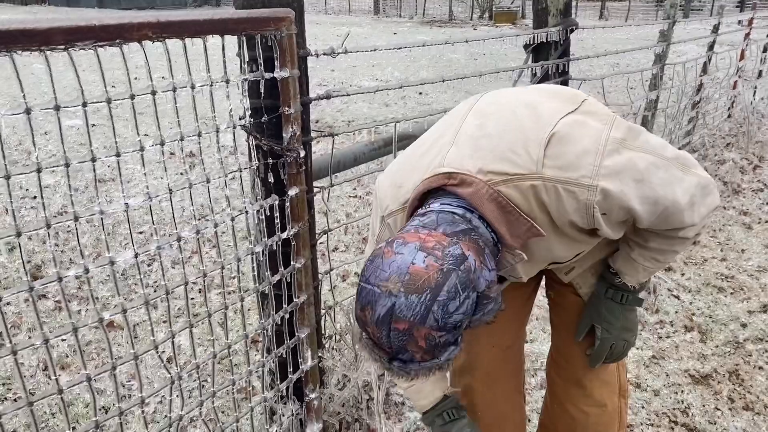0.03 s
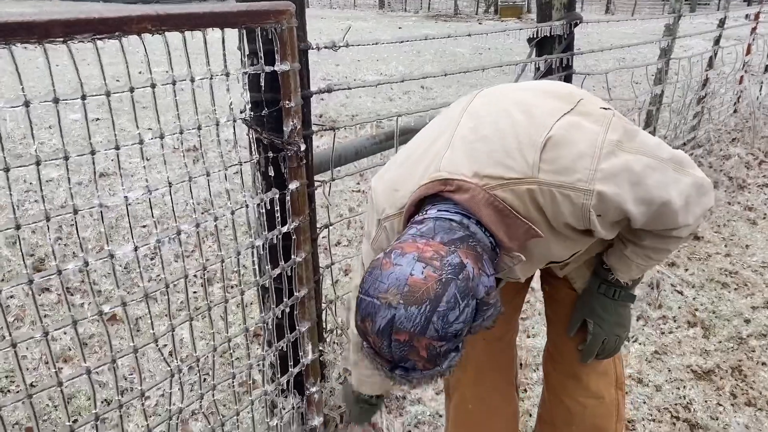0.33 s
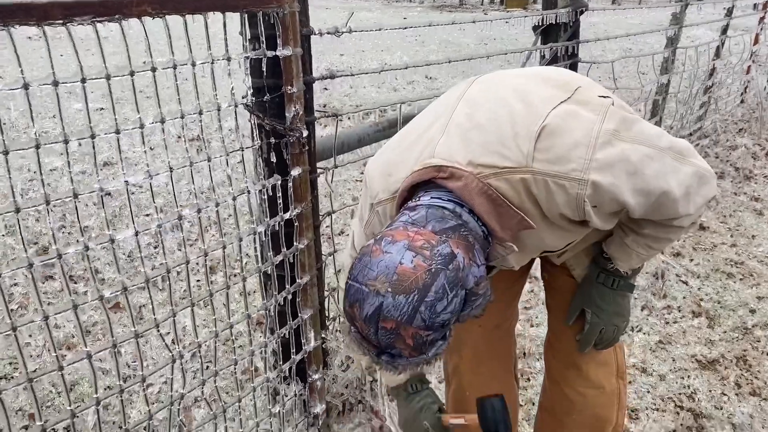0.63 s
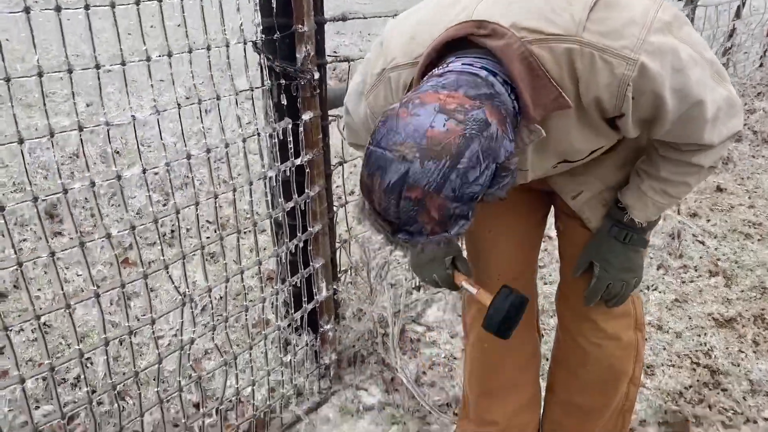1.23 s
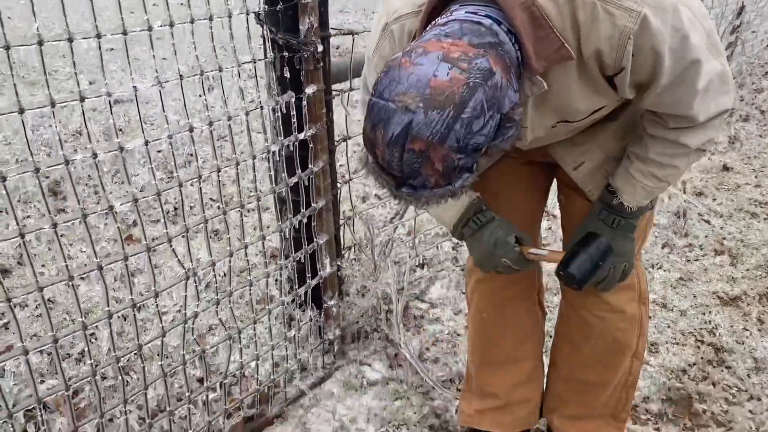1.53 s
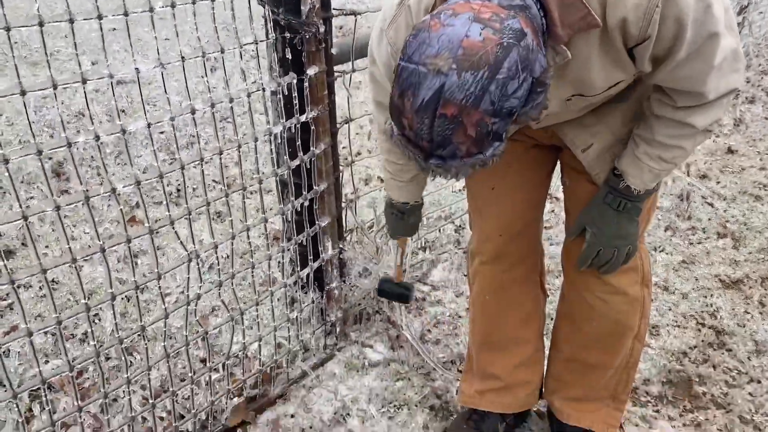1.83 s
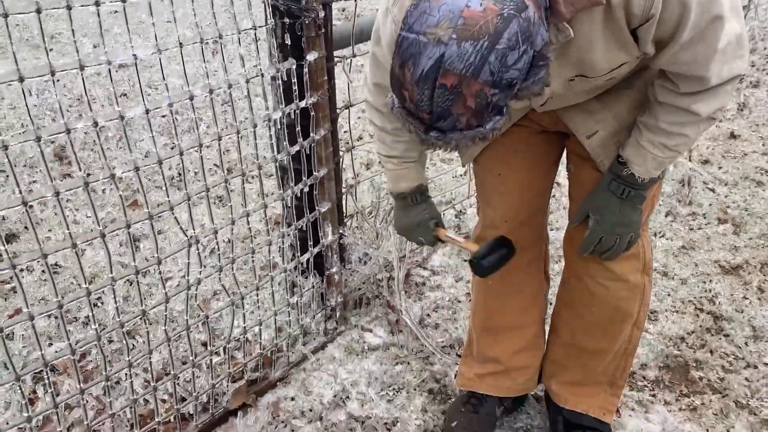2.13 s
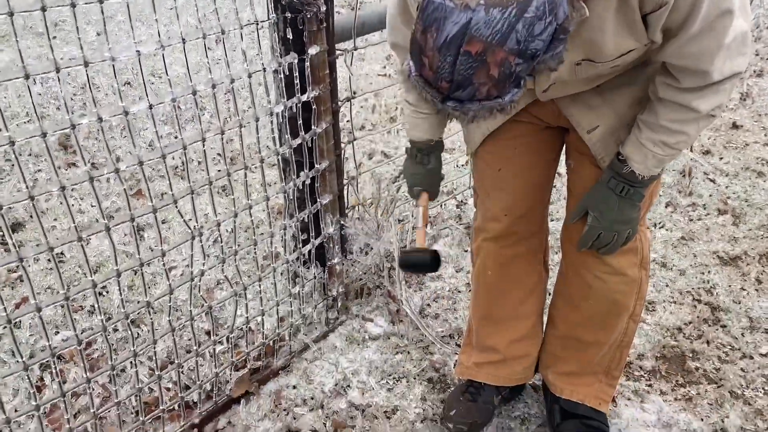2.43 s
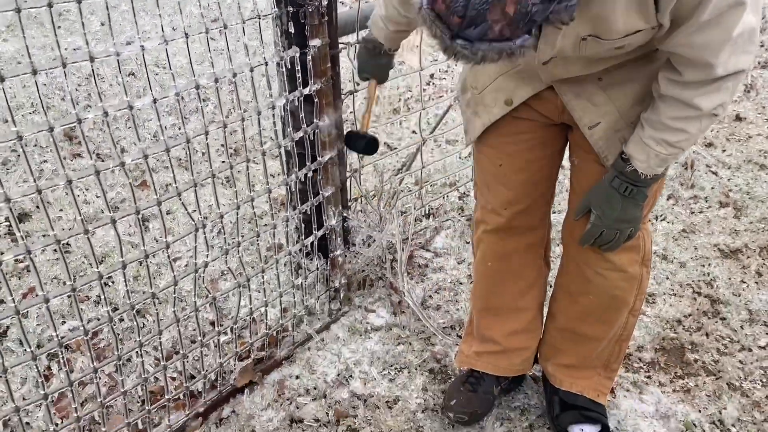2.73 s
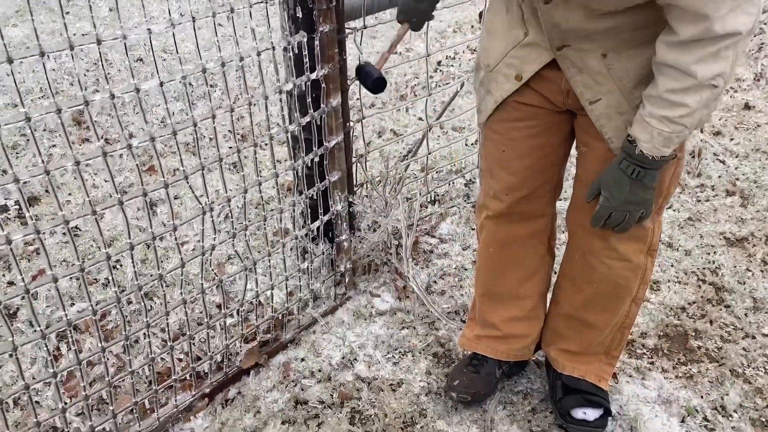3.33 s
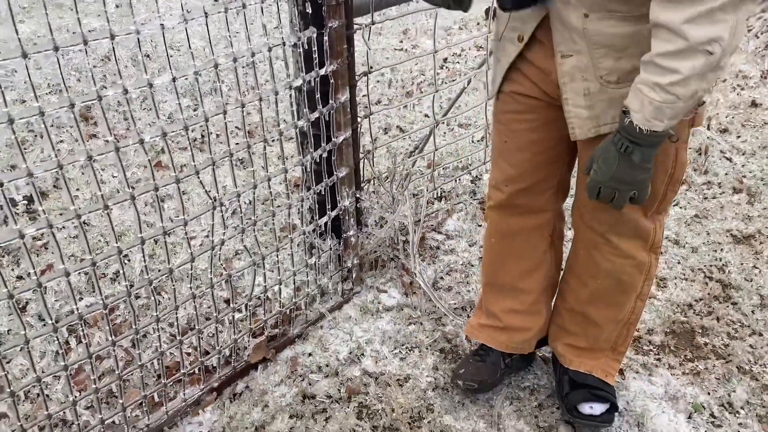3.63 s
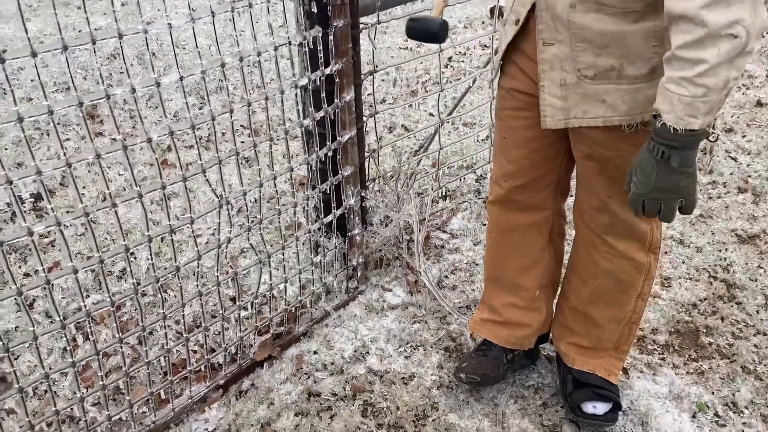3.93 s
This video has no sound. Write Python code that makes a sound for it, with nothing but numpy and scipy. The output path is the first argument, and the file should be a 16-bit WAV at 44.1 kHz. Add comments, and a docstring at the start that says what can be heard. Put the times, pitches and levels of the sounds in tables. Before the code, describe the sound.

Close up in an open field, a rubber mallet knocks seven times on a frozen gate post. Ice shatters with every hit, the wire mesh sizzles and fragments tick to the ground, while uneven wind rumbles on the microphone.

```python
"""Mallet on an iced gate post

Outdoors, in stereo, close to an ice-coated gate post; a rubber mallet strikes it seven times.
Each blow is a short knock of the post and a crunch of shattering ice; the wire mesh sizzles and
shards patter down. Wind buffets the microphone with low, uneven thumps over faint open-field hiss."""
import sys
import numpy as np
from scipy import signal
from scipy.fft import rfft, irfft, next_fast_len
from scipy.io import wavfile
from scipy.ndimage import map_coordinates

SR = 44100
rng = np.random.default_rng(int(sys.argv[2]) if len(sys.argv) > 2 else 0)


def dump_mix(stems):
    """Bounce the given channels to the path in sys.argv[1] as a 16-bit WAV at rate SR."""
    frames = np.atleast_2d(stems).T  # one column per channel
    limited = np.clip(frames, -1, 1)  # hard clip at full scale
    pcm = np.round(limited * 32767).astype(np.int16)
    wavfile.write(sys.argv[1], SR, pcm)


N = 176400

# Mallet blows, each with two pitches that the struck spot favours; levels are relative within a column:
# start_s, knock_db, first_hz, second_hz, thud_db, thud_hz, crunch_db, sizzle_db, fall_db
BLOWS = [(0.1798, -12.5, 700, 2500, -28, 200, -11.5, -28, -39.5),
         (0.7487, -12.5, 1045, 1400, -28.5, 230, -19.5, -31, -40),
         (1.6840, -12, 470, 900, -17.5, 256, -13.5, -24, -38),
         (2.2016, -12.5, 1950, 790, -14.5, 255, -15.5, -24.5, -39.5),
         (2.687, -10.5, 700, 1045, -31, 260, -14, -20.5, -41),
         (3.2048, -12.5, 700, 530, -17, 200, -15.5, -21, -37),
         (3.7073, -11.5, 1400, 1560, -16.5, 172, -11.5, -29, -38)]
CONTACT_S, RISE_S = 0.0017, 0.00063  # the rubber head stays on the post; rise of the knock
TOP_HZ = 15950  # upper edge of the sound


def post_knocks():
    """Each blow rings the post briefly, treble first; the struck spot decides which modes stand out."""
    # Modes of the post: pitch_hz, relative_db, t60_s
    modes = [(485, -7, .075), (698, -3, .05), (860, -5, .04), (1045, -2, .04), (1150, -4, .03),
             (1400, -1.5, .038), (1650, -3, .024), (1950, 0, .022), (2500, 0, .014), (2950, 2.5, .016),
             (3650, -5, .03)]
    focus_db, focus_octaves = 10, .2  # lift and width of the favoured regions
    travel_s = 0.00119  # delay of a 1 kHz bending wave along the post; lower pitches arrive later
    out, t = np.zeros((2, N)), np.arange(SR // 5) / SR
    hz, level_db, t60 = np.transpose(modes)[:, :, None]
    age = t - travel_s * np.sqrt(1000 / hz)
    near = lambda focus_hz: np.exp(-(np.log2(hz / focus_hz) / focus_octaves) ** 2)
    for start_s, knock_db, first_hz, second_hz, *_ in BLOWS:
        lift_db = focus_db * (near(first_hz) + .8 * near(second_hz))
        gain = amp(level_db + lift_db + rng.normal(0, 1, hz.shape))
        detuned_hz = hz * rng.normal(1, 0.0067, hz.shape)
        phase = 2 * np.pi * detuned_hz * age + rng.normal(0, 0.5, (2, len(hz), 1))
        ring = (gain * np.sin(phase) * envelope(age, RISE_S, CONTACT_S, t60)).sum(axis=1)
        add(out, start_s, amp(knock_db + 5) * ring / np.linalg.norm(gain))
    return out


def frame_thuds():
    """The heavy gate frame answers each blow with a dull, well-damped thud."""
    # Spectrum of the frame's rattle: frequency_hz, density_db
    rattle_spectrum = [(40, 0), (120, -6), (280, -2), (500, -5), (900, -14), (2000, -34)]
    out, t = np.zeros((2, N)), np.arange(SR // 4) / SR
    rattle = amp(-1.5) * noise(rattle_spectrum)
    for start_s, _, _, _, thud_db, thud_hz, *_ in BLOWS:
        i = round(start_s * SR)
        body = np.sin(2 * np.pi * thud_hz * t) + rattle[:, i:i + len(t)]
        add(out, start_s, amp(thud_db) * body * envelope(t, RISE_S, CONTACT_S, t60=0.1))
    return out


def shattering_ice():
    """The ice shatters, the wire mesh sizzles and a shower of crumbs follows in flurries."""
    # Spectra of the breaking ice, the mesh and the falling crumbs: frequency_hz, density_db
    crunch_spectrum = [(200, -22), (700, 2), (1500, 4), (3000, 1.5), (5000, -1), (8000, -3), (12000, -3.5),
                       (16000, -4.5)]
    sizzle_spectrum = [(200, -33), (700, -2.5), (1500, -4.5), (3000, -5), (5000, -2.5), (8000, -2.5),
                       (12000, 0), (16000, -1.5)]
    patter_spectrum = [(200, -9), (800, -6), (1500, -7.5), (3000, -1.5), (5000, -2), (8000, 0),
                       (12000, 2.5), (16000, 1)]
    crunch_level, sizzle_level, fall_level = np.zeros((3, N))
    t = np.arange(SR) / SR
    for start_s, *_, crunch_db, sizzle_db, fall_db in BLOWS:
        add(crunch_level, start_s, amp(crunch_db) * envelope(t, rise_s=.00013, hold_s=.003, t60=.054))
        add(sizzle_level, start_s, amp(sizzle_db) * envelope(t, rise_s=.001, hold_s=.018, t60=.24))
        add(fall_level, start_s, amp(fall_db) * envelope(t, rise_s=.11, hold_s=.2, t60=60 / 35.5))
    crunch = crunch_level * grains(crunch_spectrum, per_s=18000, scatter_db=-1.5, life_s=.00033)
    sizzle = sizzle_level * grains(sizzle_spectrum, per_s=4000, scatter_db=3, life_s=.001)
    flurries = amp(1.5 * wobble(per_s=35))
    shower = fall_level * flurries * grains(patter_spectrum, per_s=2200, scatter_db=4, life_s=.002)
    return crunch + sizzle + shower


def ice_snaps():
    """The ice coat breaks with a dry crack, followed by a trickle of crumbs."""
    # Brittle snaps of the coat: start_s, relative_db
    snaps = [(.1068, -3), (.1716, -21), (1.234, -14.5), (2.4922, -18), (3.622, -22)]
    # Spectrum of a snap: frequency_hz, density_db
    snap_spectrum = [(2000, -18), (4200, 0), (7000, -5), (11000, -9), (16000, -9)]
    level, t = np.zeros(N), np.arange(SR // 10) / SR
    crack = envelope(t, rise_s=.0003, hold_s=.001, t60=.004)
    trickle = amp(-21) * decay(t, t60=.06)
    for start_s, level_db in snaps:
        add(level, start_s, amp(level_db - 6) * (crack + trickle))
    return level * noise(snap_spectrum)


def landing_ice():
    """Thin shards tick brightly as they land, and around 1.2 s a step crackles on icy grass; heavier lumps
    clack on the frozen ground."""
    # Shard ticks (the rows near 1.2 s are the crackle of a step on icy grass) and lumps landing: start_s,
    # relative_db, pitch_hz
    shards = [(0.1716, -11.5, 3600), (0.2718, -22.5, 3240), (0.3141, -22, 5120), (0.4103, -17.5, 3570),
              (0.532, -27, 5900), (0.9233, -25.5, 5540), (0.9917, -22, 5820), (1.13, -23.5, 5460),
              (1.1965, -22.5, 8500), (1.209, -15.5, 9000), (1.236, -26, 4300), (1.251, -20, 5070),
              (1.268, -27, 6000), (1.403, -32.5, 4600), (1.5529, -36, 12500), (1.8425, -24, 3480),
              (1.8969, -20, 4200), (1.907, -23, 6000), (2.0001, -21, 2920), (2.006, -23, 3300),
              (2.0815, -27, 4000), (2.1235, -26.5, 4250), (2.161, -27, 4160), (2.3413, -20, 4380),
              (2.4922, -15.5, 5200), (2.6192, -24.5, 5100), (2.6413, -27, 5930), (3.111, -28.5, 3700),
              (3.53, -20, 4180), (3.622, -16, 4880), (3.685, -23, 2800), (3.701, -23, 3500)]
    lumps = [(.302, -27.5, 1495), (.337, -30.5, 1110), (3.328, -32, 1210), (3.402, -32, 1430),
             (3.566, -32, 1304), (3.784, -26.5, 1185)]
    low_hz = 1530  # thin shards radiate little below this pitch
    ticks = ice_pieces(shards, t60=0.02, scatter=0.371, crack_db=-4, crumble_db=-26.5)
    clacks = ice_pieces(lumps, t60=0.048, scatter=0.313, crack_db=-56, crumble_db=-5)
    return filtered(ticks, lambda hz: hz ** 2 / (hz ** 2 + low_hz ** 2)) + clacks


def ice_pieces(landings, t60, scatter, crack_db, crumble_db):
    """Each piece clicks with eight short modes scattered around its pitch, and crumbles a little."""
    out, t = np.zeros((2, N)), np.arange(SR // 12) / SR
    grit_level = amp(crack_db) * decay(t, t60=.003) + amp(crumble_db) * decay(t, t60=.12)
    for start_s, level_db, pitch_hz in landings:
        hz = np.minimum(pitch_hz * np.exp(scatter * rng.standard_normal((8, 1))), TOP_HZ)
        phase = 2 * np.pi * hz * t + rng.normal(0, 1, (2, 8, 1))
        ring = (np.sin(phase) * decay(t, t60)).mean(axis=1)
        click = ring + grit_level * rng.standard_normal(len(t))
        add(out, start_s, amp(level_db + 6) * click / np.abs(click).max())
    return out


def wind_buffets():
    """A lumpy rumble on the microphone, with sudden turbulent thumps that sink in pitch."""
    # Course of the rumble: time_s, level_db
    rumble_levels = [(0, -28), (.14, -29), (.22, -43), (.29, -46), (.34, -36), (.6, -49), (.68, -37),
                     (.78, -46), (.89, -47), (.94, -36), (1.54, -37), (1.6, -50), (1.66, -41), (1.97, -38),
                     (2.12, -43), (2.22, -28), (2.33, -35), (2.5, -35), (2.6, -52), (2.72, -38),
                     (2.87, -39), (3.02, -24), (3.12, -38), (3.22, -26), (3.38, -34), (3.58, -34),
                     (3.67, -42), (3.78, -32), (4, -36)]
    # Sudden thumps: start_s, relative_db, pitch_factor
    buffets = [(.02, -22.5, 1.2), (0.11, -18, 1.33), (.133, -22, 1.1), (0.655, -23.5, 0.76),
               (0.719, -19.5, 0.87), (0.934, -25, 0.64), (1.013, -26.5, 1.09), (1.206, -22.5, 0.61),
               (1.507, -22, 0.9), (1.934, -24, 0.67), (2.176, -12.5, 1.1), (2.249, -20, 1.2),
               (2.35, -16.5, 0.45), (2.411, -23.5, 0.64), (2.485, -13, 0.89), (2.792, -26, 0.85),
               (2.906, -20.5, 1.1), (2.926, -17, 1), (2.964, -14, 1), (2.993, -28.5, .7),
               (3.012, -12, 0.85), (3.054, -25.5, .75), (3.158, -13, 1.4), (3.177, -8, 0.5),
               (3.278, -17.5, 0.58), (3.292, -21.5, 1.3), (3.321, -21.5, 0.98), (3.455, -18.5, 0.89),
               (3.522, -18.5, .8), (3.622, -17, 0.75), (3.906, -21, 1.08)]
    # Spectra of the rumble and of the puff of air in each thump: frequency_hz, density_db
    rumble_spectrum = [(20, -60), (45, -6), (85, -1.5), (150, -4), (280, -9), (450, -19), (700, -32),
                       (1200, -58)]
    puff_spectrum = [(30, 4), (90, 9.5), (250, -4), (450, -5), (700, -17), (1200, -34.5), (3000, -80)]
    peak_s, sag_s = 0.0067, 0.01055
    from_hz, to_hz = 373, 86.3  # the glide at a pitch factor of 1
    rumble_db = np.interp(np.arange(N) / SR, *np.transpose(rumble_levels))
    rumble = amp(rumble_db) * unit(amp(2.5 * wobble(per_s=40)) * noise(rumble_spectrum))
    thumps, puff_level = np.zeros((2, N))
    t = np.arange(SR // 10) / SR
    swell = t / peak_s * np.exp(1 - t / peak_s)
    glide_hz = to_hz + (from_hz - to_hz) * np.exp(-t / sag_s)
    for start_s, level_db, pitch_factor in buffets:
        unsteady = np.exp(.3 * map_coordinates(rng.standard_normal(64), [t * 400], mode="nearest"))
        phase = 2 * np.pi * np.cumsum(pitch_factor * glide_hz * unsteady) / SR
        add(thumps, start_s, amp(level_db - 3) * swell * np.sin(phase))
        add(puff_level, start_s, amp(level_db - 8.5) * swell)
    return rumble + thumps + puff_level * noise(puff_spectrum)


def field_air():
    """The faint, steady hiss of an open field."""
    # Spectrum of the hiss: frequency_hz, density_db
    air_spectrum = [(30, 20.5), (200, 3), (600, 5), (1200, 1), (2400, 2), (3500, -7), (8000, -9),
                    (16000, -13.5)]
    return amp(-49.5) * noise(air_spectrum)


def grains(spectrum, per_s, scatter_db, life_s):
    """A dense stream of tiny ice clicks of uneven size."""
    onsets = rng.random(N) < per_s / SR
    sizes = onsets * amp(scatter_db * np.minimum(rng.exponential(size=N), np.pi))
    power = signal.lfilter([1], [1, -np.exp(-2 / (life_s * SR))], sizes ** 2)
    return spread(np.sqrt(power) * rng.standard_normal((2, N)), spectrum)


def noise(spectrum):
    """Smooth stereo noise."""
    return spread(rng.standard_normal((2, N)), spectrum)


def spread(pair, spectrum):
    """Two unrelated signals become a coloured stereo sound of rms 1."""
    # Likeness of the two channels: frequency_hz, correlation (0-1)
    likeness = [(50, 1), (300, 0.4), (1000, 0.2), (3000, 0.59), (5500, 0.77), (7000, 0.82), (9000, 1),
                (16000, 0.49)]
    angle = lambda hz: np.arccos(np.clip(along(likeness, hz), 0, 1)) / 2
    response = lambda hz: amp(along(spectrum, hz)) * [np.cos(angle(hz)), np.sin(angle(hz))]
    mid, side = filtered(pair, response)
    return unit(np.array([mid + side, mid - side]))


def envelope(t, rise_s, hold_s, t60):
    """Rise, hold and decay; silent before t = 0."""
    t = np.maximum(t, 0)
    return (1 - np.exp(-t / rise_s)) * decay(np.maximum(t - hold_s, 0), t60)


def decay(t, t60):
    """Fall by 60 dB every t60 seconds."""
    return amp(-60 * t / t60)


def amp(db):
    """Decibels to gain."""
    return 10 ** (np.asarray(db) / 20)


def unit(x):
    """Scale to rms 1."""
    return x / np.sqrt(np.mean(x ** 2) + 1e-20)


def along(points, hz):
    """Interpolate (frequency_hz, value) points on a log axis."""
    point_hz, values = np.transpose(points)
    return np.interp(np.log(hz + 1), np.log(point_hz + 1), values)


def wobble(per_s):
    """A smooth random curve with per_s knots a second."""
    knots = rng.standard_normal(int(N * per_s / SR) + 4)
    return map_coordinates(knots, [np.arange(N) * per_s / SR])


def filtered(x, response):
    """Apply a frequency response to x."""
    size = next_fast_len(N + SR // 2)
    return irfft(rfft(x, size) * response(np.fft.rfftfreq(size, 1 / SR)), size)[..., :N]


def add(track, start_s, sound):
    """Mix a sound into a track from start_s on."""
    i = max(0, round(start_s * SR))
    track[..., i:i + sound.shape[-1]] += sound[..., :max(0, N - i)]


def scene():
    """Gate and ice close up, wind on the microphone, the open field behind."""
    gate = post_knocks() + frame_thuds()
    ice = shattering_ice() + ice_snaps() + landing_ice()
    return gate + ice + wind_buffets() + field_air()


def record(dry):
    """Stereo widening: the channels differ in level and phase. Peaks are rounded, deep bass and top cut."""
    # Left channel's level over the right: frequency_hz, level_db
    left_excess = [(100, 0), (300, 1), (700, 3.5), (3000, 2.6), (6500, 1.2), (16000, -0.5)]
    # Left channel's phase lead: frequency_hz, lead_rad
    left_lead = [(0, 0), (600, -.3), (1500, .8), (4300, .5), (5600, 1.2), (7400, 0), (8600, -3),
                 (9500, -3.3), (10400, -6), (11600, -6.4), (12700, -9.2), (13600, -9.6), (14600, -12.5),
                 (16000, -12.6)]
    ceiling, low_cut_hz = .9, 35
    sides = np.array([[.5], [-.5]])  # each channel takes half the difference
    gain = lambda hz: amp(sides * along(left_excess, hz))
    phase = lambda hz: sides * np.interp(hz, *np.transpose(left_lead))
    widened = filtered(dry, lambda hz: gain(hz) * np.exp(1j * phase(hz)))
    rounded = widened / (1 + np.abs(widened / ceiling) ** 4) ** (1 / 4)
    low_cut = lambda hz: hz ** 3 / np.sqrt(hz ** 6 + low_cut_hz ** 6)
    top_cut = lambda hz: 1 / np.sqrt(1 + (hz / TOP_HZ) ** 160)
    return filtered(rounded, lambda hz: low_cut(hz) * top_cut(hz))


dry = scene()
out = record(dry)
dump_mix(out)
```